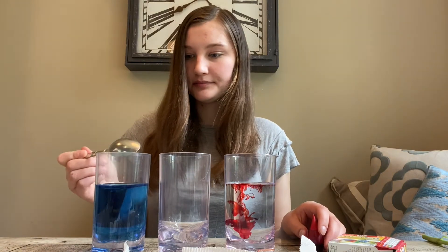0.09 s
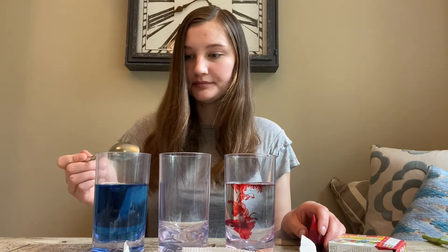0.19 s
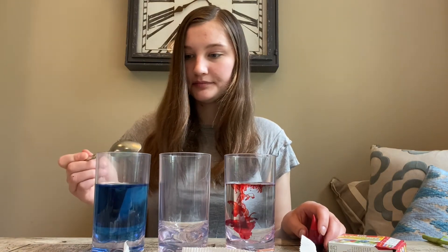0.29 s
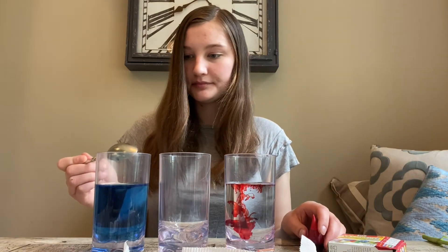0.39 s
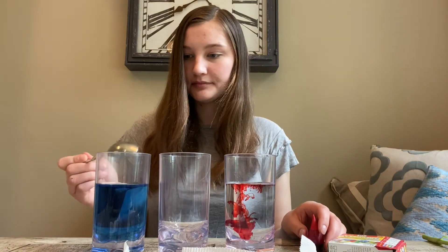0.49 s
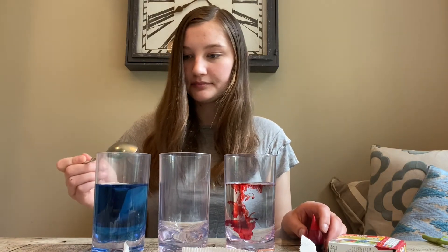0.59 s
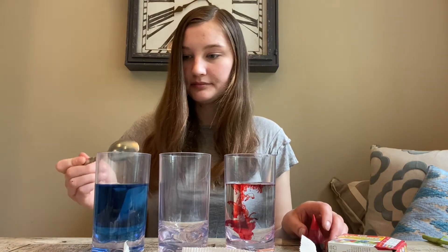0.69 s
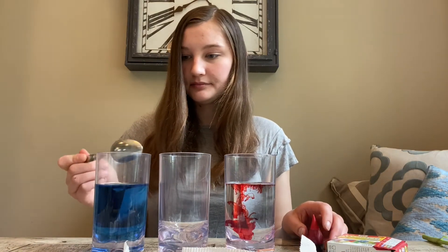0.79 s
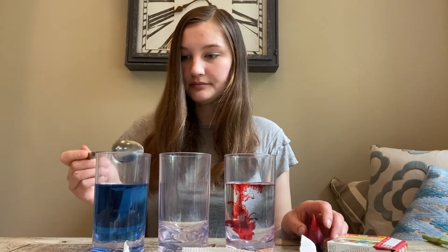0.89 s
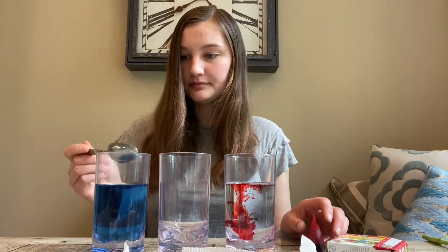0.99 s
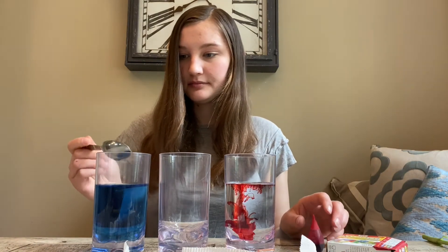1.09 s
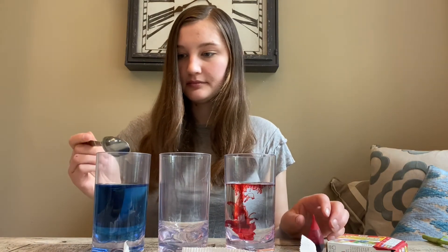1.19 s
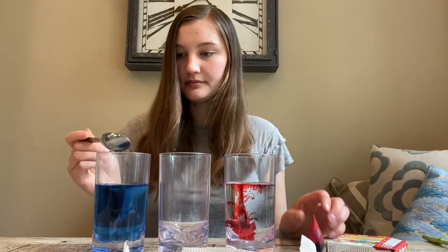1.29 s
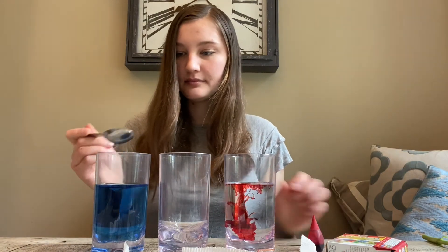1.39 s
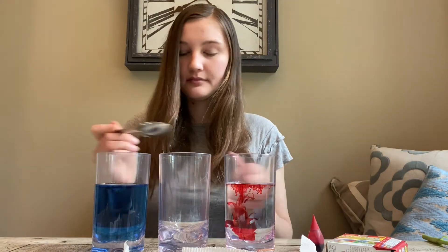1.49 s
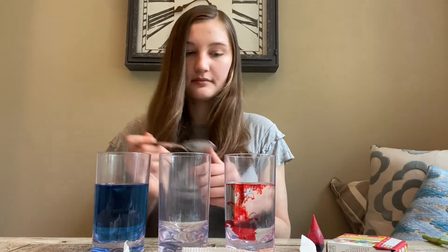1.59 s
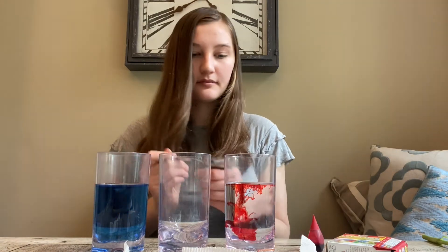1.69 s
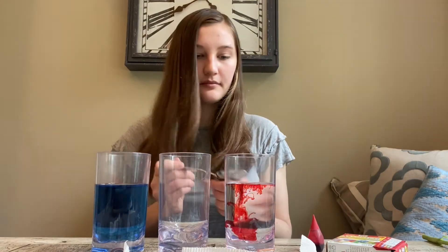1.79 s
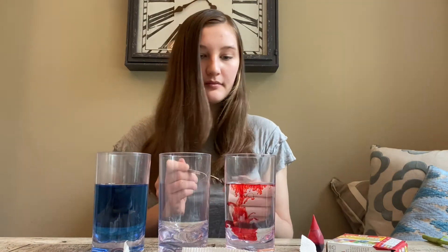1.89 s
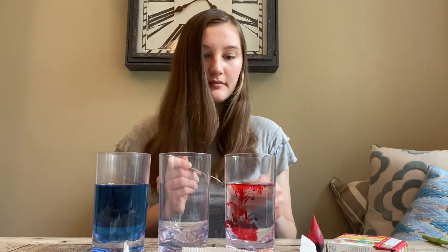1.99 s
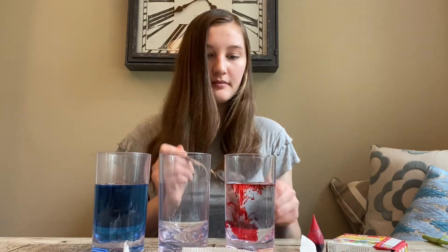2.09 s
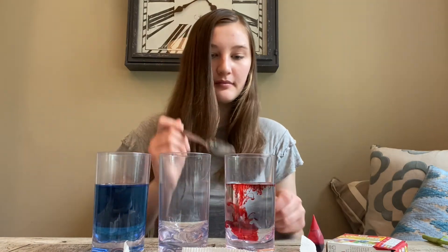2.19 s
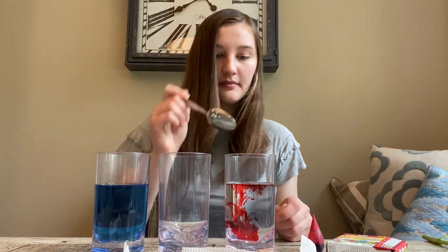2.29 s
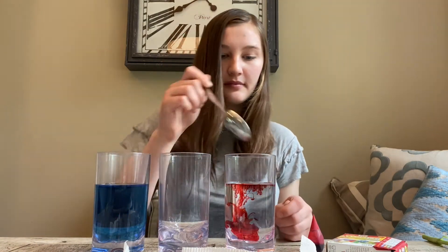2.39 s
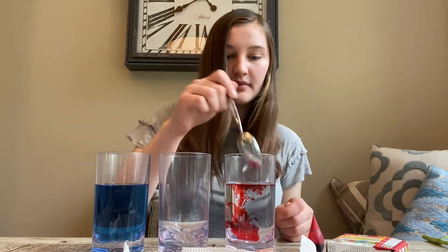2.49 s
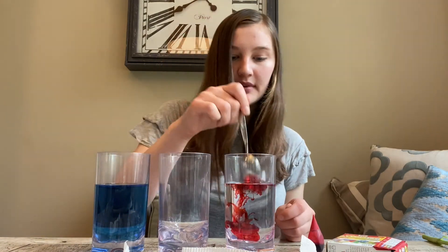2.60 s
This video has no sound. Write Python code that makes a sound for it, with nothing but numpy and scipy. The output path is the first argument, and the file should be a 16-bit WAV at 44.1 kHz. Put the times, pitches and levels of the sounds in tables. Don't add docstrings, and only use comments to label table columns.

```python
import sys
import numpy as np
from scipy import signal
from scipy.fft import irfft
from scipy.io import wavfile

SR = 44100
rng = np.random.default_rng(int(sys.argv[2]) if len(sys.argv) > 2 else 0)


def how_loud(loudness_db):
    steps = np.asarray(loudness_db, float) / 20
    return 10 ** steps


def output_pcm(signal):
    pcm = np.clip(np.atleast_2d(signal).T, -1, 1) * 32767
    wavfile.write(sys.argv[1], SR, np.round(pcm).astype(np.int16))


N = 114660

# pitch in Hz, t60 in seconds.
TAIL_T60 = [(60, 0.69), (250, 0.3), (1000, 0.61), (4000, 0.24), (12000, 0.19)]
# pitch in Hz, left-right correlation.
TAP_ALIKE = [(60, 1), (130, 0.94), (300, 0.45), (700, 0.19), (1500, 0.32), (4000, .5), (9000, 0.46)]


def at_hz(points, hz):
    p = np.array(points)
    return np.interp(np.log(hz), np.log(p[:, 0]), p[:, 1])


def band(x, low, high):
    return signal.sosfilt(signal.butter(2, [low, min(high, .45 * SR)], "band", fs=SR, output="sos"), x)


def drift(rate):
    slow = np.interp(np.arange(N) / SR * rate, np.arange(200), rng.standard_normal(200))
    return slow / slow.std()


def add(out, sound, s):
    i = int(s * SR)
    n = min(sound.shape[1], N - i)
    out[:, i:i + n] += sound[:, :n]


def stereo_bands(size, alike_at):
    settle = 4000
    band_edges = 24 * 2 ** np.arange(0, 9.5, 1 / 3)
    white = rng.standard_normal((2, 2, size + settle))
    for k, (low, high) in enumerate(zip(band_edges, band_edges[1:])):
        mid, side = band(white[k % 2], low, high)
        hz = np.sqrt(low * high)
        alike = np.clip(at_hz(alike_at, hz), -.99, .99)
        left, right = np.sqrt(1 + alike) * mid + np.sqrt(1 - alike) * side * [[1], [-1]]
        lag = 14 * (220 < hz < 2200)
        yield hz, np.array([np.roll(left, lag), right])[:, settle:]


def envelope(t, hz, t60):
    rise_s = .0006 + 1.1 / hz
    rise = 1 - np.exp(-(t / rise_s) ** 2)
    return rise * how_loud(-60 * t / t60)


def steady(spectra):
    # pitch in Hz, left-right correlation.
    floor_alike = [(60, 0.31), (180, 0.53), (550, 0.13), (1650, 0.2), (5000, 0.34), (15000, .5)]
    layers = np.zeros((len(spectra), 2, N))
    for hz, noise in stereo_bands(N, floor_alike):
        for k, (spectrum, _, patchy_db) in enumerate(spectra):
            if spectrum[0][0] / 1.2 < hz < spectrum[-1][0] * 1.1:
                layers[k] += how_loud(at_hz(spectrum, hz) + patchy_db * drift(9.0)) * noise
    return sum(how_loud(db) * layer / layer.mean(0).std() for layer, (_, db, _) in zip(layers, spectra))


def hum():
    hum_hz, hum_db, wobble_db = 121.9, -58, 0.5
    phase = 2 * np.pi * hum_hz * np.arange(N) / SR + .5 * drift(8.0)
    return how_loud(hum_db + wobble_db * drift(4.7)) * np.sin(phase)


def house():
    # pitch in Hz, level in dB per Hz.
    rumble = [(15, -45), (25, -15.5), (90, -5.5), (112, -3), (140, -2.5), (174, -1.5), (300, -11),
              (616, -21), (3000, -52.5), (3900, -103), (6600, -120)]
    # pitch in Hz, level in dB per Hz.
    hiss = [(2000, -5), (3000, -4.5), (6000, -7), (8300, -6), (10400, -9), (12600, -16.5), (13600, -21.5),
            (15500, -24)]
    return steady([(rumble, -55.5, 1.2), (hiss, -88.5, .6)]) + hum()


def squeaks():
    # start in seconds, length in seconds, level in dB rms, pitch in Hz.
    chirps = [
        (0.264, .11, -78.5, 3390),
        (1.365, 0.072, -84, 4170),
        (2.501, 0.14, -80, 3375),
        (2.513, .1, -86, 4090),
    ]
    width_hz, rise_s, fall_s = 180.0, 0.032, 0.023
    out = np.zeros((2, N))
    for s, length, db, hz in chirps:
        t, noise = np.arange(8000) / SR, rng.standard_normal((3, 8000))
        tone = noise[0] + 0.8 * noise[1:]
        for _ in range(2):
            tone = band(tone, hz - width_hz / 2, hz + width_hz / 2)
        swell = np.clip(np.minimum(t / rise_s, (length - t) / fall_s), 0, 1)
        add(out, how_loud(db) * swell * tone / tone.std(), s)
    return out


def ticks():
    # start in seconds, peak in dB, centre in Hz, left-right difference in dB.
    touches = [
        (1.078, -80, 6030, 4),
        (1.386, -59.5, 900, -1.5),
        (1.388, -72, 2600, 1.5),
        (1.989, -81, 8500, 8),
        (2.450, -61, 3300, -2.5),
        (2.4543, -65.5, 4500, -3.5),
        (2.5478, -45, 15200, 1.5),
        (2.5475, -60.5, 11200, 4),
        (2.5579, -57.5, 12500, 14),
    ]
    # start in seconds, peak in dB.
    bounces = [
        (0.3954, -76),
        (0.5669, -53),
        (0.7482, -55.5),
    ]
    bounce_hz, touch_room_db, bounce_room_db = 6100, -26.5, -18.0
    rows = [row + (touch_room_db,) for row in touches]
    rows += [(s, db, bounce_hz, 0., bounce_room_db) for s, db in bounces]
    out, t = np.zeros((2, N)), np.arange(int(.25 * SR)) / SR
    for s, db, hz, pan_db, room_db in rows:
        high_tick = hz >= 10000
        noise = rng.standard_normal((3, len(t)))
        snap_t60 = .003 + 9.3 / hz
        snap = noise[0] * how_loud(-60 * t / snap_t60) * [[1], [-.7 if high_tick else 1]]
        room = how_loud(room_db) * (noise[0] + noise[1:]) * envelope(t, 300.0, at_hz(TAIL_T60, hz))
        ratio = 1.3 if high_tick else 1.7
        click = band(band(snap + room, hz / ratio, hz * ratio), hz / ratio ** 2, hz * ratio ** 2)
        add(out, how_loud(db + pan_db * np.array([[.5], [-.5]])) * click / np.abs(click).max(), s)
    return out


def pan(hz):
    # pitch in Hz, left-right difference in dB.
    tap_pan = [(60, 0.5), (180, 0.57), (550, 0.0), (1650, -0.96), (4970, 0.49), (15000, 0.5)]
    return how_loud(at_hz(tap_pan, hz) * np.array([[.5], [-.5]]))


def dying_noise(t, spectrum, t60_at):
    out, power = 0, 0
    for hz, noise in stereo_bands(len(t), TAP_ALIKE):
        gain, shape = how_loud(at_hz(spectrum, hz)), envelope(t, hz, t60_at(hz))
        share = hz * .46 / SR
        power += gain ** 2 * share
        burst = noise * shape
        balance = np.sqrt(2 * share * np.mean(shape ** 2) / np.mean(burst ** 2))
        out = out + gain * pan(hz) * burst * balance
    return out / np.sqrt(power)


def modes(t, table, steady_share):
    flutter_hz, scatter_db = 260.0, 0.5
    out = 0
    for k, (hz, db, t60) in enumerate(table):
        turn = np.arccos(np.clip(at_hz(TAP_ALIKE, hz), -1, 1)) / 2
        knots = rng.standard_normal(400)
        rough = np.interp(t * 2 * flutter_hz, np.arange(400), knots)
        flutter = steady_share + (1 - steady_share) * rough
        shape = how_loud(db + scatter_db * knots[-1]) * envelope(t, hz, min(t60, .7)) * flutter
        ring = np.sin(2 * np.pi * hz * t + turn * np.array([[-1], [1]]))
        out = out + (-1) ** k * pan(hz) * shape * ring
    return out


def knock():
    # pitch in Hz, level in dB per Hz.
    knock_colour = [(150, -30), (300, -9), (420, 0), (620, 0.5), (800, -4.5), (1200, 0.5), (1700, -10),
                    (2600, -37)]
    late_cycles, start_hz = 3.0, 2600
    left_lag_s, left_db = .00018, -5.5
    hz = np.maximum(np.arange(2001) * SR / 4000, 1)
    spread = late_cycles * (np.log(hz) - hz / start_hz)
    late = 2 * np.pi * (spread + hz * np.array([[left_lag_s], [0]]))
    left = how_loud(left_db * (hz > 800) * np.array([[1], [0]]))
    colour = how_loud(at_hz(knock_colour, hz) - 60 * (hz > 4000) - 60 * (hz < 120))
    pulse = irfft(colour * left * np.exp(-1j * late), 4000)
    return pulse / np.abs(pulse).max() * np.clip(np.linspace(2, -2, 4000), 0, 1)


def taps():
    # start in seconds, level in dB, lows in dB, highs in dB, hardness of the crack in dB.
    blows = [
        (0.0095, -37.5, 2, -23.5, -0.5),
        (0.1996, -23, -1, -33.5, -3.5),
        (0.365, -17, -4, -33, -3),
        (0.5385, -17, -3.5, -34.5, -0.5),
        (0.7142, -14, -3, -42.5, 5),
        (0.3953, -28.5, -2, -30, -1.5),
        (0.5666, -24.5, -2.5, -42.5, -3),
        (0.7472, -28, -15, -19.5, -1),
    ]
    # pitch in Hz, level in dB, t60 in seconds.
    table_modes = [(65.25, -14, .6), (98.2, -6.5, 0.37), (153.1, -3.5, 0.4), (165.3, -2.5, 0.26),
                   (198, -15.5, 0.11), (261, -6.5, 0.52), (305.5, -17.5, 0.47), (387.1, 0, 0.18),
                   (484.8, -15.5, 0.18), (542, -5, .14), (596, -12, 0.12), (646.8, -5, 0.16),
                   (754, -10.5, .1), (871, -17.5, 0.32)]
    # pitch in Hz, level in dB, t60 in seconds.
    cup_modes = [(1135, 3.5, .2), (1242, 6, 0.2124), (1273, 5.5, 0.1884), (1655, -2, 0.3),
                 (1900, -9.5, 0.22), (2160, -8, 0.4), (3255, -5.5, 0.098), (3425, -13, 0.28),
                 (3970, -9.5, 0.13), (4880, -11.5, .2), (5260, -16.5, .17), (6880, -26, .12)]
    # pitch in Hz, level in dB, t60 in seconds.
    spoon_modes = [(8400, -51.5, .14), (9300, -56.5, .13), (10080, -63.5, .12), (11950, -54.5, .13)]
    # pitch in Hz, level in dB per Hz.
    crack_colour = [(1200, -12.5), (2000, -1), (2700, -6), (3500, -2), (5000, -8.5), (7000, -10),
                    (9000, -24), (13000, -34.5)]
    # pitch in Hz, level in dB per Hz.
    tail_colour = [(40, -25.5), (120, -13.5), (165, 1), (280, -6), (600, -14.5), (1500, -40), (5000, -51.5),
                   (13000, -83)]
    table_db, cup_db, tail_db, knock_db, crack_db = -3, -24, -8.5, -3.0, -18.5
    cup_steady = .15
    same = .6
    out, t = np.zeros((2, N)), np.arange(int(.6 * SR)) / SR
    rings = [dying_noise(t, tail_colour, lambda hz: at_hz(TAIL_T60, hz)) for _ in range(4)]
    cracks = [dying_noise(t[:4000], crack_colour, lambda hz: 0.0087 + 10.6 / hz) for _ in range(3)]
    pulse = knock()
    low_pass = signal.butter(2, 300, fs=SR, output="sos")
    mean_low, mean_high = np.mean(blows, 0)[2:4]
    for k, (s, db, low_db, high_db, hard_db) in enumerate(blows):
        ring = np.sqrt(same) * rings[3] + np.sqrt(1 - same) * rings[k % 3]
        body = how_loud(tail_db) * ring + how_loud(table_db) * modes(t, table_modes, 1)
        body[:, :14000] += how_loud(cup_db) * modes(t[:14000], cup_modes, cup_steady)
        body[:, :14000] += modes(t[:14000], spoon_modes, 1)
        body[:, :4000] += how_loud(hard_db) * (how_loud(knock_db) * pulse + how_loud(crack_db) * cracks[k % 3])
        lows, highs = signal.sosfilt(low_pass, body), band(body, 2500, 18000)
        body += lows * (how_loud(low_db - mean_low) - 1) + highs * (how_loud(high_db - mean_high) - 1)
        fade_out = how_loud(-1e3 * np.maximum(t - .52, 0))
        add(out, how_loud(db) * body * fade_out, s)
    return signal.sosfilt(signal.butter(8, 12900, fs=SR, output="sos"), out)


def scene():
    return house() + squeaks() + ticks() + taps()


def top_cut(x):
    return signal.sosfilt(signal.butter(12, 16020, fs=SR, output="sos"), x)


def record(dry):
    return top_cut(dry)


dry = scene()
out = record(dry)
output_pcm(out)
```